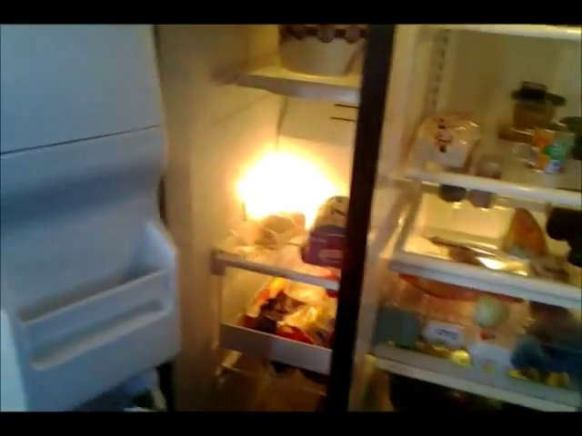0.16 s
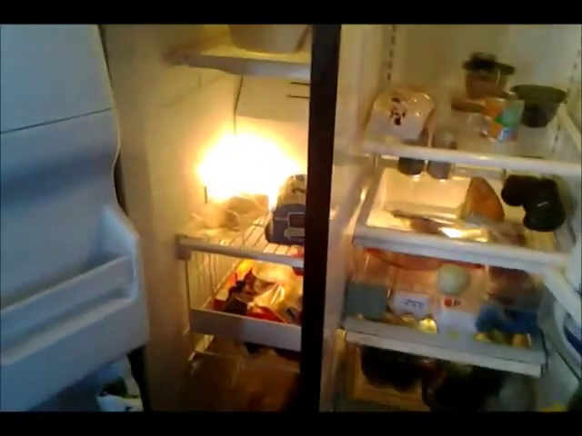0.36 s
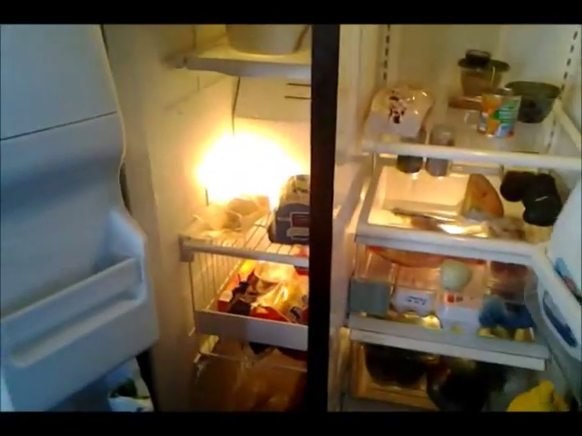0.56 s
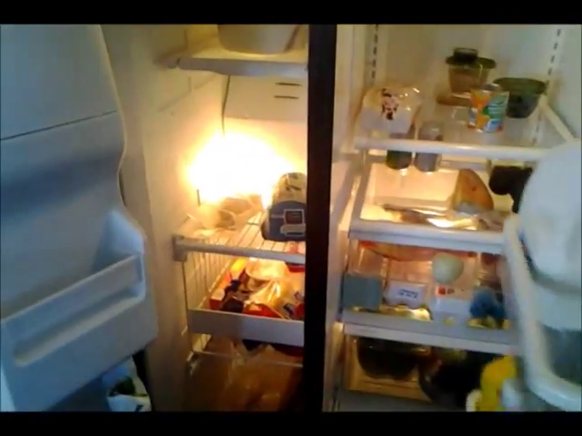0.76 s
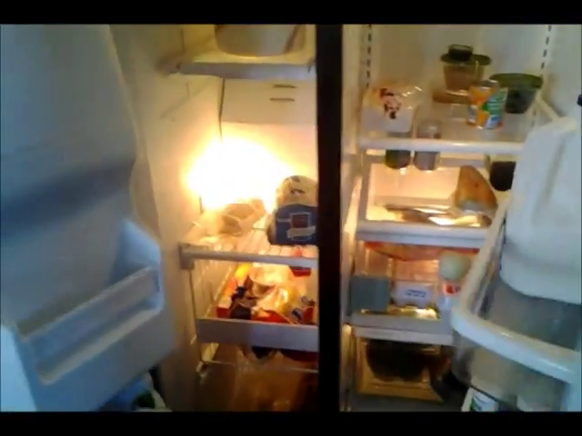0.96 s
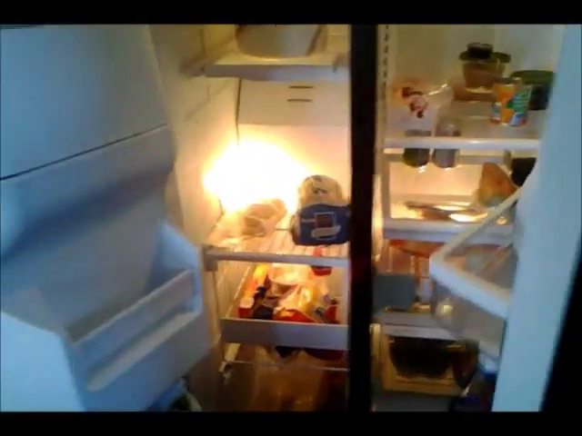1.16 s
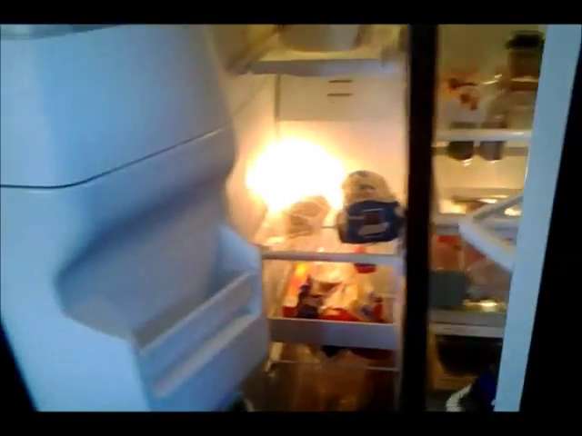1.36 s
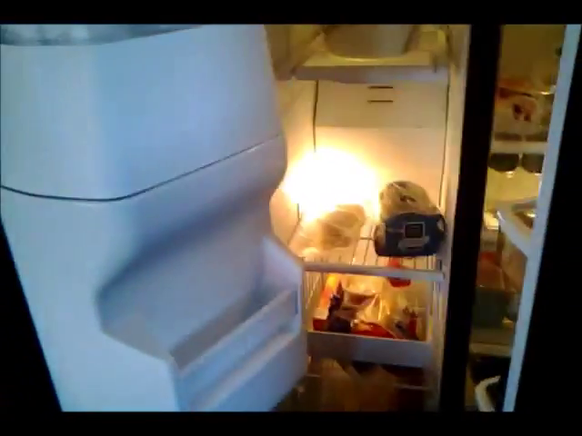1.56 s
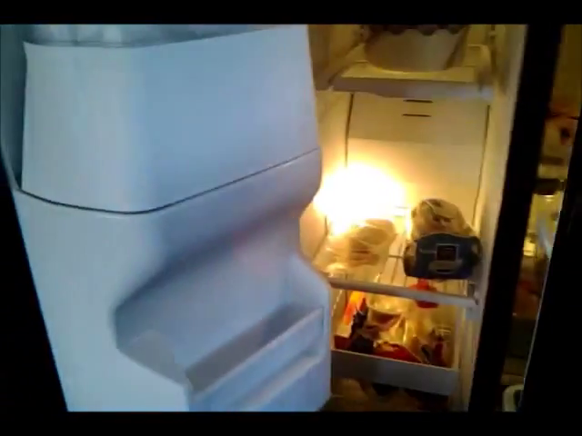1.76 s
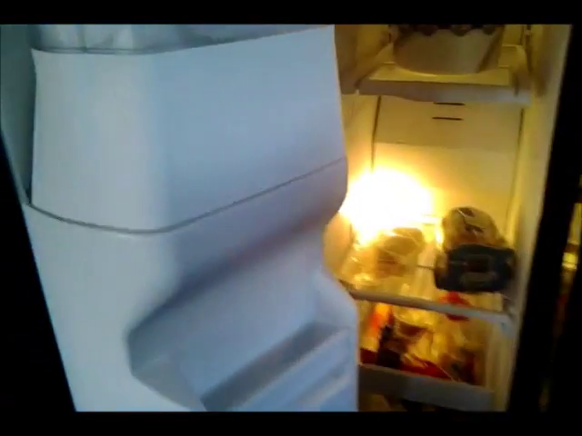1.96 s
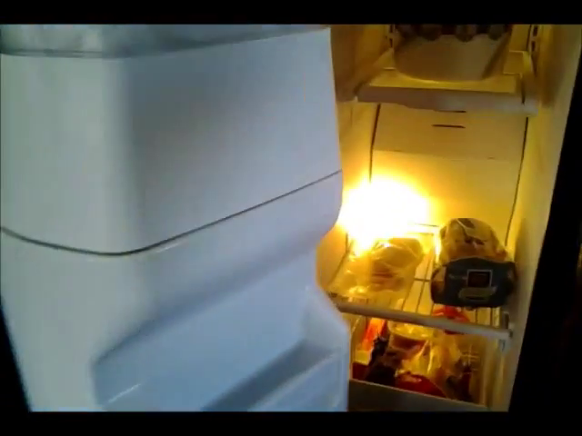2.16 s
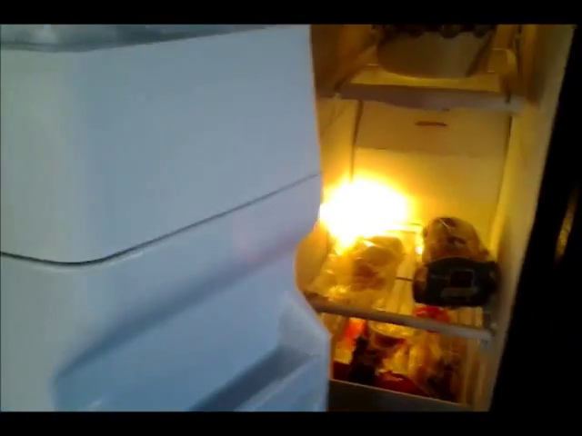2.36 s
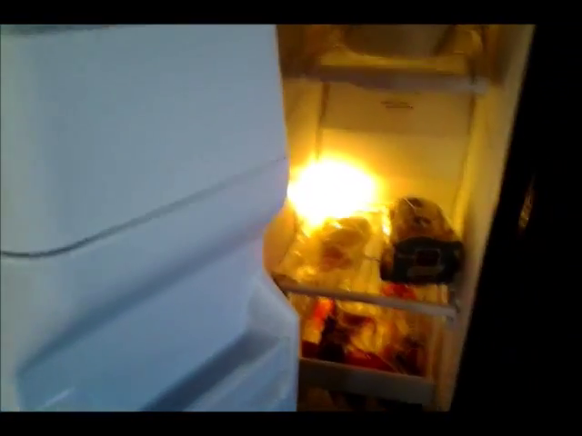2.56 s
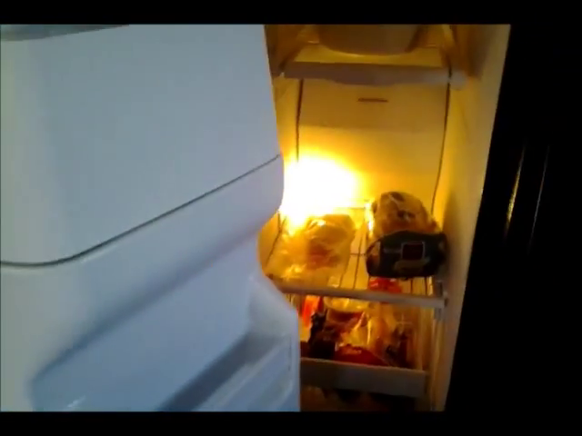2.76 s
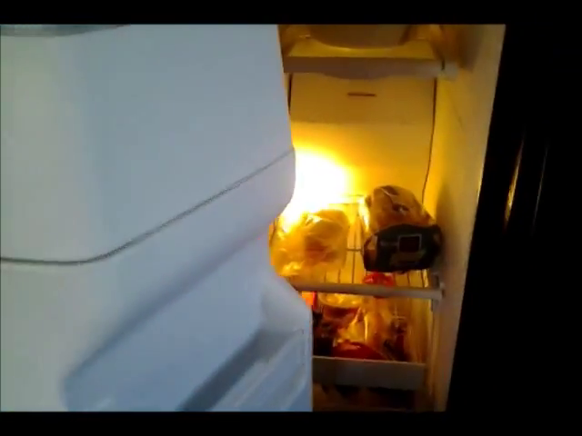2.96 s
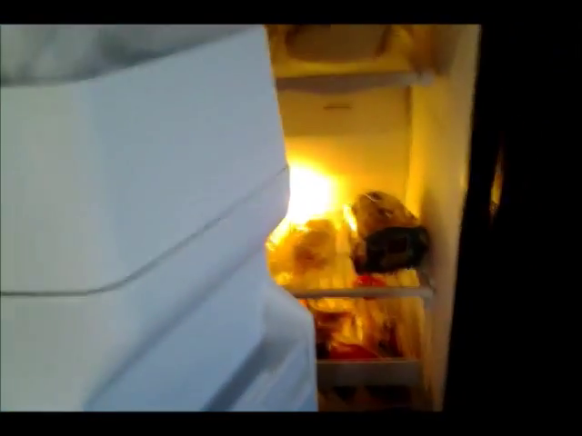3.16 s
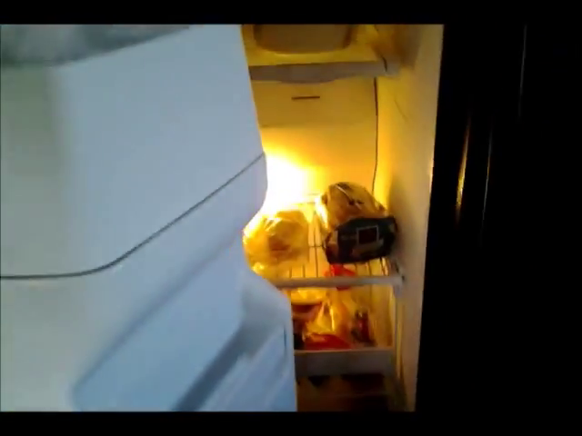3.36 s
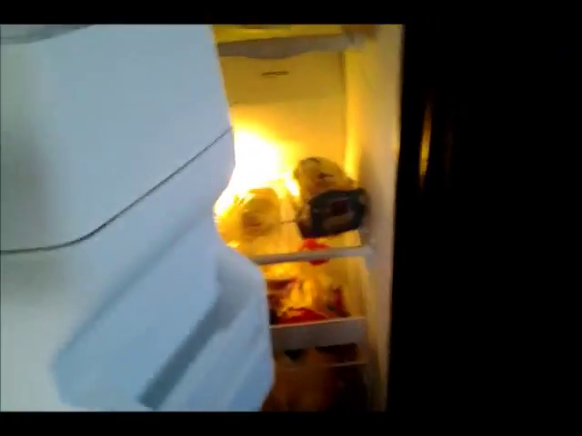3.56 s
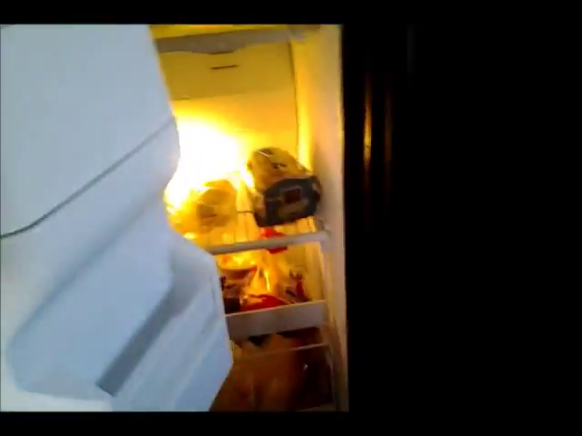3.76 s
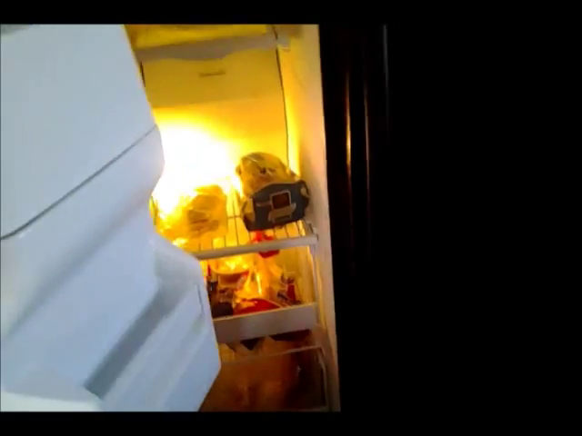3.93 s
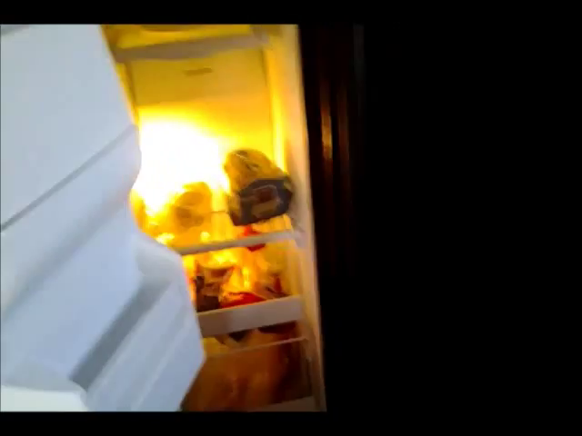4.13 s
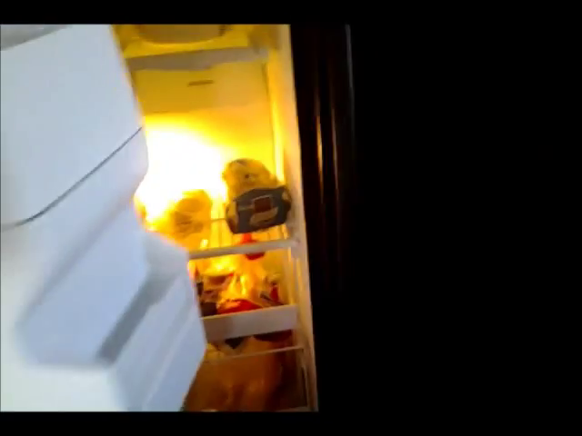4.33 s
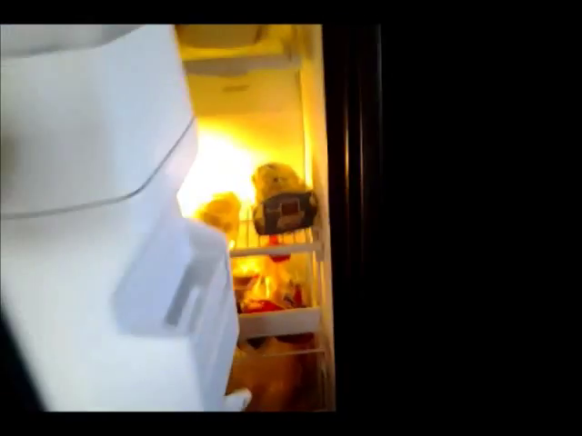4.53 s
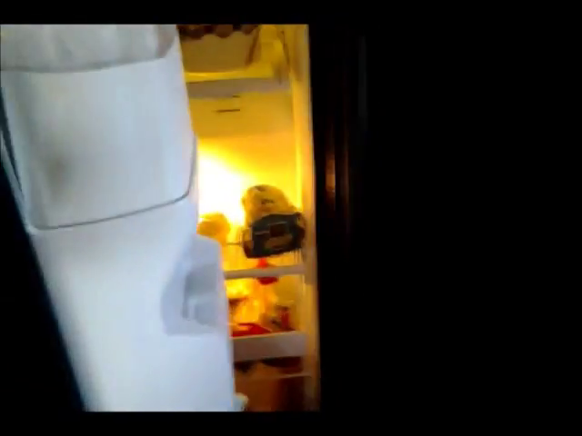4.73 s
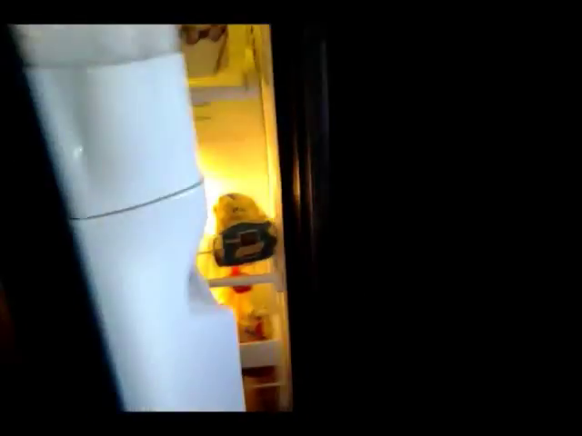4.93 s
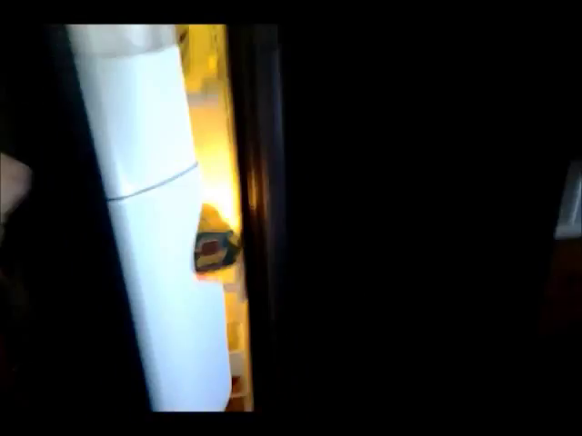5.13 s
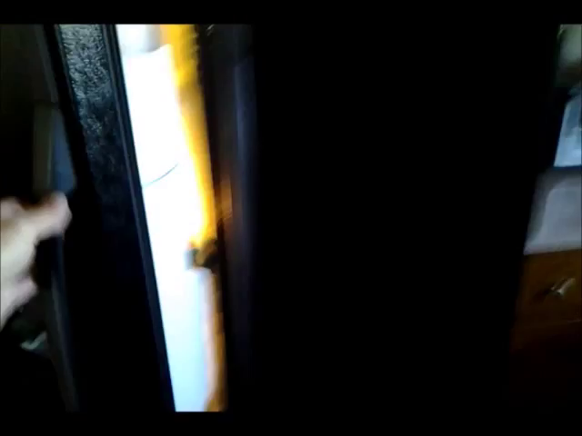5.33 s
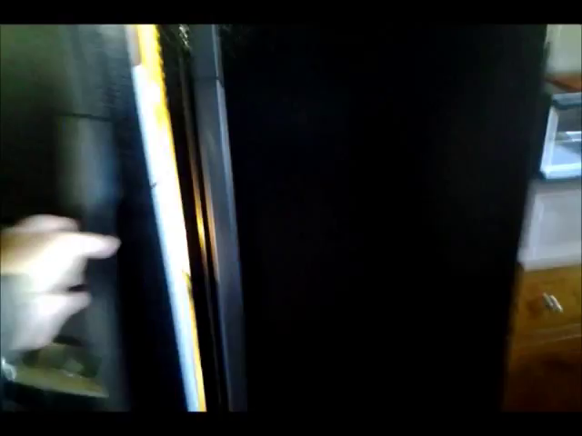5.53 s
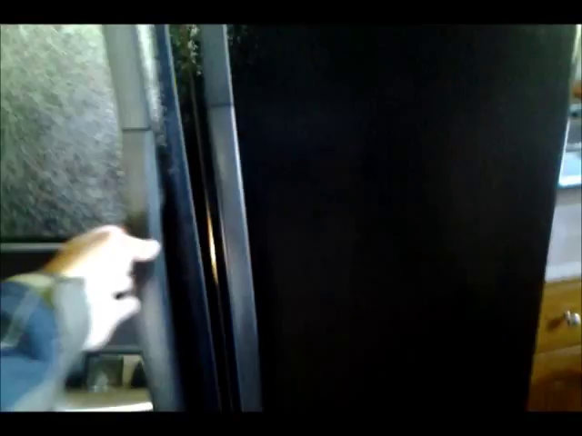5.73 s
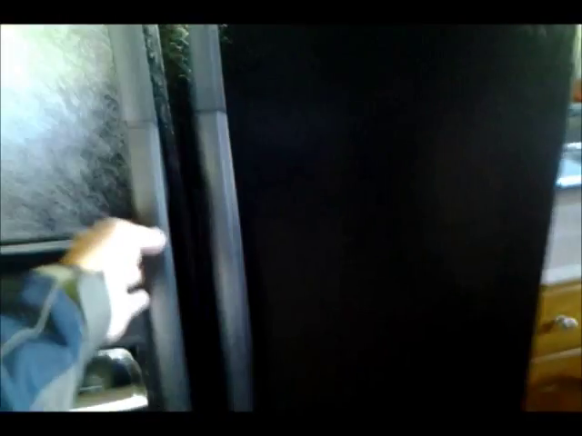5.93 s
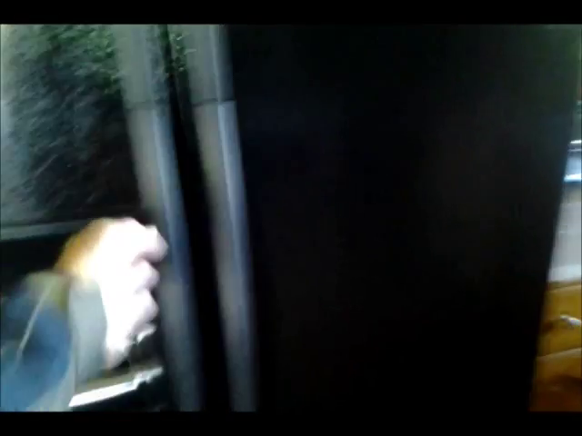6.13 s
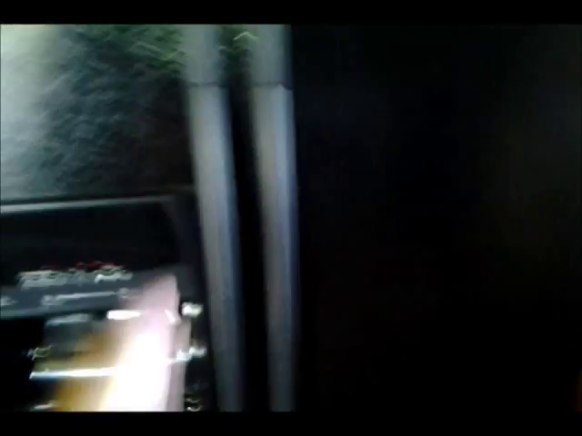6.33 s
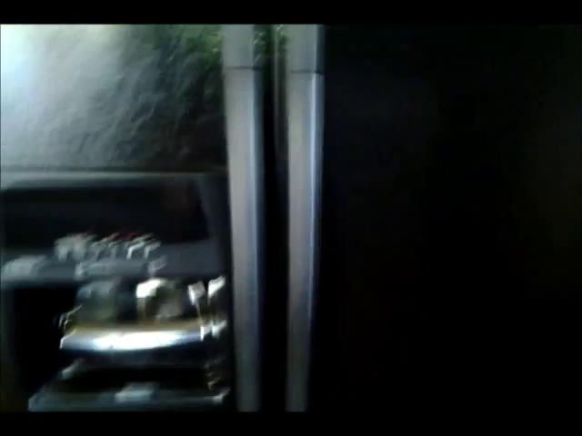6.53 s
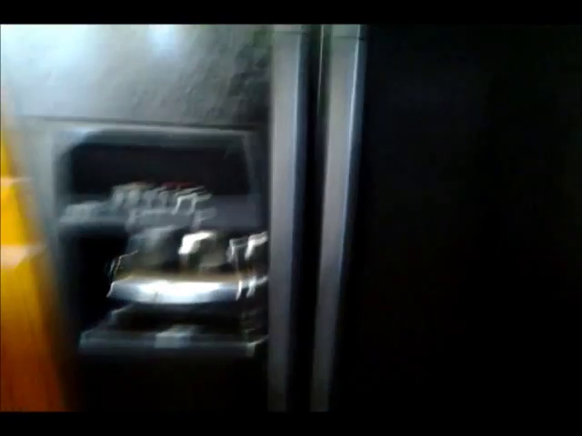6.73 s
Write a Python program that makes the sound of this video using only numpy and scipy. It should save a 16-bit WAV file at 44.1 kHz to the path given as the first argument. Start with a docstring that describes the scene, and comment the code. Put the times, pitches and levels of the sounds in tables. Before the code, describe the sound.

In a humming kitchen, a fridge door thumps closed with a plastic clatter, close ticks follow, then the second door slams and jars clink before it.

```python
"""A low compressor hum and soft rustling run throughout; close ticks and small bumps come before and between
the slams of two doors of a side-by-side refrigerator in a kitchen, pushed shut one after the other.
Slams and knocks are shaped noise and damped modes struck at once, with low swings for the moving mass.
Plastic bins clatter, loads in the door racks knock, rattle and clink, and decaying noise gives the room.
The hum is a sum of wavering tones; the microphone overloads on the slams and its treble is cut off."""
import sys
import numpy as np
from scipy import signal
from scipy.fft import rfft, irfft, next_fast_len
from scipy.io import wavfile
from scipy.ndimage import map_coordinates

SR = 44100
rng = np.random.default_rng(int(sys.argv[2]) if len(sys.argv) > 2 else 0)


def int16_out(signal):
    """Quantize to a 16-bit WAV file."""
    q = np.round(np.clip(np.atleast_2d(signal).T, -1, 1) * 32767)
    wavfile.write(sys.argv[1], SR, q.astype(np.int16))


N = 299478
TOP_HZ = 7500  # upper edge of the microphone's band

# Doors landing. Each row: time in seconds, levels in dB of crack, clatter, liner, cabinet and hollow body,
# hollow body in Hz, crack and clatter tilt in dB per octave, squeezed air in dB, push in dB, push in Hz,
# push swell in seconds, jolted loads in dB, their flight in seconds.
DOOR_LANDINGS = [(2.6122, -6.5, -15.5, -21, -18, -7.5, 194, -0.5, -25, -1, 93.8, 0.013, -16, .055),
                 (6.3235, -7.5, -11, -13, -20, -10.5, 291, 0.2, -14, -5.5, 75, 0.0024, -14, .019)]
# Noise of a contact with a plastic rack. Each row: frequency in Hz, spectral level in dB.
RACK_SPECTRUM = [(60, -28.5), (170, -4.5), (320, -0.5), (550, -4.5), (900, -8), (1500, -7), (2500, -13),
                 (4000, -24.5), (6000, -26), (7800, -57)]


def slams():
    """Impact excitation: a door cracks on its frame; bins, hollow door, liner, cabinet and loads answer."""
    # Sharp contact, then plastic bins. Each row: frequency in Hz, spectral level in dB.
    crack_spectrum = [(100, -11), (300, 7.5), (700, 2.5), (1500, 4), (2400, -11), (3400, -1.5),
                      (6000, -5.5), (7800, -26)]
    clatter_spectrum = [(60, -26), (150, -2.5), (300, 2), (480, -2.5), (650, -6.5), (1200, 0), (1850, -5.5),
                        (2400, -15), (3300, -12), (4300, -17.5), (6000, -18.5), (7800, -47)]
    # Plastic door liner. Each row: mode in Hz, width in Hz, relative level in dB.
    liner_modes = [(524, 38, -10), (732, 24, -3.5), (974, 75, -6), (1212, 33, 5), (1450, 70, -7.5),
                   (1613, 54, 0), (1868, 45, -0.5), (2236, 36, -4.5), (2470, 160, -8)]
    # Steel cabinet. Each row: mode in Hz, mean level in dB, t60 in seconds.
    cabinet_modes = [(64.7, -10, .4), (104.5, -5.5, 0.98), (133, -8, .35), (196.1, 1, 0.38),
                     (238.7, -6.5, 0.34), (292.2, -0.5, 0.31), (334, -10, 0.38), (363.6, -6.5, 0.5),
                     (477, -5, 0.34), (520.5, -10, 0.36)]
    out = np.zeros(N)
    for (s, crack_db, clatter_db, liner_db, cabinet_db, body_db, body_hz, tilt_db,
         *_, loads_db, flight) in DOOR_LANDINGS:
        chatter = amp(1.6 * wobble(169, size=SR))
        add(out, s, amp(crack_db) * burst(crack_spectrum, tilt_db, t60=0.046))
        add(out, s, amp(clatter_db) * chatter * burst(clatter_spectrum, tilt_db, t60=0.26))
        add(out, s, amp(body_db) * struck([(body_hz, body_hz * 0.37, 0)], t60=0.2))
        add(out, s, amp(liner_db) * struck(liner_modes, t60=0.15))
        add(out, s, amp(cabinet_db) * ring(cabinet_modes, rough=0.37, attack=0.0049))
        add(out, s + flight, amp(loads_db) * bouncing(body_hz=270, tilt_db=-4))
    return out


def thuds():
    """Momentum transfer: each slam squeezes air, pushes the frame and rocks the cabinet; doors also bump softly."""
    # Soft bumps of the swinging doors; the second row is the higher part of the first bump.
    # Each row: time in seconds, peak level in dB, frequency in Hz.
    soft_bumps = [(.433, -24, 42.7), (.455, -29.5, 148), (1.06, -34, 97), (2.39, -33, 110),
                  (3.859, -34, 84), (4.03, -35, 82), (5.483, -33, 75.4)]
    # the gasket meets the frame just before the shell, squeezing out air
    gasket_lead_s, squeeze_s = 0.0023, 0.0067
    # then the whole cabinet rocks, at a level relative to the push
    rock_delay_s, rock_db, rock_hz, rock_swell_s = 0.01, -7, 53, 0.019
    bump_swell_cycles = 1.1

    out, lead = np.zeros(N), seconds(SR // 10)
    # pressure grows exponentially until the door lands
    squeeze = np.exp((lead - lead[-1]) / squeeze_s) * signal.windows.tukey(len(lead), .02)
    for s, *_, air_db, push_db, push_hz, swell, _, _ in DOOR_LANDINGS:
        add(out, s - lead[-1], amp(air_db) * squeeze)
        add(out, s - gasket_lead_s, amp(push_db) * swing(push_hz, swell))
        add(out, s + rock_delay_s, amp(push_db + rock_db) * swing(rock_hz, rock_swell_s))
    for s, db, hz in soft_bumps:
        add(out, s, amp(db) * swing(hz, bump_swell_cycles / hz))
    return out


def racks():
    """Repeated impacts: loads knock and rebound on plastic racks, rattle unevenly and clink together."""
    # Knocking loads. Each row: time in seconds, level in dB, body in Hz, tilt in dB per octave.
    load_knocks = [(.504, -38.5, 330, 1), (.55, -33.5, 397, 1), (.564, -32, 385, 0.5), (.601, -33, 363, 6),
                   (1.1193, -21.5, 377, 0.65), (1.849, -38.5, 590, -7.5), (2.396, -30.5, 675, -1),
                   (2.5091, -31, 324, 1), (2.985, -36.5, 796, 1.5), (4.0209, -31, 480, -2.5),
                   (5.527, -34, 500, -2.5), (5.994, -17, 570, -2)]
    # Hard containers touching. Each row: time in seconds, ring level in dB, contact level in dB.
    container_clinks = [(5.997, -33.5, -35), (6.1097, -21, -25)]
    # Clinking container. Each row: mode in Hz, width in Hz, relative level in dB.
    container_modes = [(753, 21, -2.5), (931, 66, -2.5), (1135, 61, -0.5), (1544, 66, -2), (1790, 65, 2.5),
                       (1927, 55, 0.5), (2130, 92, -5.5), (2530, 60, -6.5), (2716, 50, -7),
                       (5400, 160, -24.5)]
    # First and last contact as the first door gathers speed, small loads first, then heavy ones.
    # Each row: time in seconds, level in dB, body in Hz, tilt in dB per octave, before random scatter.
    rattle_ends = [(2.41, -38.5, 673, 0), (2.6, -34, 170, -1.5)]
    out = np.zeros(N)
    for s, db, body_hz, tilt_db in load_knocks:
        add(out, s, amp(db) * bouncing(body_hz, tilt_db))
    for s, ring_db, contact_db in container_clinks:
        add(out, s, amp(ring_db) * struck(container_modes, t60=0.21))
        add(out, s, amp(contact_db) * burst(RACK_SPECTRUM, tilt_db=-1.5, t60=0.069))
    for s, db, body_hz, tilt_db in np.linspace(*rattle_ends, 11):
        late, strength, pitch = rng.uniform(-1, 1, 3)
        contact = knock(body_hz * np.exp(.3 * pitch), tilt_db)
        add(out, s + .005 * late, amp(db + 2 * strength) * contact)
    return out


def handling():
    """Near-field sound: ticks and brushes so close to the microphone that no room is heard on them."""
    # Small dry ticks. Each row: time in seconds, level in dB, centre frequency in Hz.
    close_ticks = [(0.218, -35, 4000), (2.307, -18, 576), (3.1438, -22, 3300), (3.3544, -27, 2230),
                   (3.573, -32, 1100), (3.6184, -25, 1100), (3.776, -21.5, 1500), (3.8066, -20.5, 1360),
                   (3.8525, -23.5, 910), (4.4253, -32.5, 1200)]
    # Brief brushing. Each row: start and end in seconds, level halfway in dB, swell from start to end in dB,
    # tilt in dB per octave.
    close_brushes = [(1.736, 1.818, -53, -3, 3), (2.892, 3.004, -44.5, -1, 1),
                     (3.191, 3.248, -37, 14.5, .5), (4.024, 4.084, -50, 3, -5.5),
                     (5.481, 5.539, -51, -6, -1.5)]
    # Cloth friction. Each row: frequency in Hz, spectral level in dB.
    cloth_spectrum = [(100, -14), (450, -10), (750, 5), (1500, -0.5), (2400, 0), (2900, 1.5), (3500, -1),
                      (5200, -5), (6400, -4.5), (7800, -29)]
    out, t = np.zeros(N), seconds(SR)
    for s, db, hz in close_ticks:
        # a short snap with a click, followed by a faint buzz of the casing; higher snaps die sooner
        decay = fade(0.0052 * (1000 / hz) ** 0.62)
        snap = np.sin(2 * np.pi * hz * t) * decay * (1 - np.exp(-8 * hz * t))
        buzz = amp(-16.5) * struck([(hz, hz * 0.27, 0)], t60=0.018)
        click = amp(-20.5) * burst(cloth_spectrum, tilt_db=-2.5, t60=0.0035)
        add(out, s, amp(db) * (snap + click + buzz))
    for start, end, db, swell_db, tilt_db in close_brushes:
        size = max(round((end - start) * SR), 64)
        grip_db = swell_db * np.linspace(-.5, .5, size) + 1.5 * wobble(192, size=size)
        grip = signal.windows.tukey(size, .3) * amp(grip_db)
        add(out, start, amp(db) * grip * noise(cloth_spectrum, tilt_db, size=size))
    return out


def background():
    """Steady tones and broadband noise: an unsteady compressor hum over rumble, air and soft rustle."""
    # Compressor and fan tones. Each row: frequency in Hz, mean rms level in dB.
    machine_tones = [(26.9, -51.5), (59.2, -53.5), (118.4, -59), (145.3, -56.5), (263.8, -53), (296.1, -60),
                     (441.4, -69.5), (619.1, -68)]
    # Low rumble, then air and rustle. Each row: frequency in Hz, spectral level in dB.
    rumble_spectrum = [(12, -32), (20, 5.5), (47, -4), (97, -8), (137, -4.5), (208, -9.5), (242, -11),
                       (262, -13), (312, -5.5), (500, -15.5), (650, -45), (1100, -120)]
    air_spectrum = [(240, -26), (400, -5.5), (538, -7), (881, -7.5), (1100, -10), (1340, -8.5),
                    (1940, -11.5), (2170, -14), (4720, -20.5), (7630, -31.5), (9920, -66), (16800, -120)]
    # Sleeve and hand movement. Each row: time in seconds, rustle level in dB.
    movement = [(0, -52.5), (.6, -51.5), (2.2, -51.5), (2.45, -46.5), (3.2, -52), (3.8, -49), (4.6, -53.5),
                (5.3, -50.5), (5.95, -52.5), (6.79, -45.5)]
    t = seconds(N)
    hum = np.zeros(N)
    for hz, db in machine_tones:
        level = amp(db + 0.93 * wobble(3.5, size=N)) * np.sqrt(2)
        hum += level * np.sin(2 * np.pi * hz * t + .35 * wobble(5.2, size=N))
    rumble_level = amp(-47.0 + 1.3 * wobble(6.6, size=N))
    rumble = rumble_level * noise(rumble_spectrum, tilt_db=-0.5, size=N)
    s, rustle_db = np.transpose(movement)
    air_level = amp(np.interp(t, s, rustle_db) + 0.44 * wobble(12, size=N))
    air = air_level * noise(air_spectrum, tilt_db=0, size=N)
    return hum + rumble + air


def kitchen(x):
    """Reverberation: a tail builds within milliseconds and each frequency decays at its own rate."""
    # Room decay. Each row: frequency in Hz, t60 in seconds.
    room_decay = [(60, 0.52), (250, 0.59), (1000, 0.82), (2500, 0.71), (7000, 0.5)]
    hz, t, z = signal.stft(rng.standard_normal(SR), SR, nperseg=256)
    decay = np.exp(-np.log(1000) * t / along(room_decay, hz)[:, None])
    tail = signal.istft(z * decay, SR, nperseg=256)[1]
    tail = tail * (1 - np.exp(-seconds(len(tail)) / 0.005))
    return signal.fftconvolve(x, tail / np.linalg.norm(tail))[:N]


def bouncing(body_hz, tilt_db, count=3):
    """Inelastic rebound: a load knocks again after each short flight; rebounds are softer and duller."""
    rebound_s, loss_db, rebound_tilt_db = .026, 8, -4
    out = np.zeros(SR)
    for k in range(count):
        contact = knock(body_hz, tilt_db + min(k, 1) * rebound_tilt_db)
        add(out, k * rebound_s, amp(-k * loss_db) * contact)
    return out


def knock(body_hz, tilt_db):
    """Contact excitation: a load strikes its plastic rack and adds its own hollow resonance."""
    attack_s, rack_t60_s = 0.00061, 0.098
    body = amp(-4.5) * struck([(body_hz, body_hz * 0.18, 0)], rack_t60_s * 1.38)
    contact = burst(RACK_SPECTRUM, tilt_db, rack_t60_s)
    return (contact + body) * (1 - np.exp(-seconds(SR) / attack_s))


def swing(hz, swell):
    """Heavily damped oscillation: a low swing whose envelope peaks after swell seconds and soon dies."""
    t = seconds(SR)
    return -(t / swell * np.exp(1 - t / swell)) ** 2 * np.sin(2 * np.pi * hz * t)


def ring(modes, rough, attack):
    """Modal superposition: modes are pushed off together, their phase shaken by loose parts."""
    t = seconds(SR)
    total = np.zeros(SR)
    for hz, db, t60 in modes:
        phase = 2 * np.pi * hz * t + rough * wobble(57, size=SR)
        total += amp(db + rng.normal(0, 1)) * fade(t60) * -np.sin(phase)
    return total * (1 - np.exp(-t / attack))


def resonances(modes, hz):
    """Resonance curves: the gain of a body whose modes add in power."""
    power = 0
    for f, width, db in modes:
        detuning = (hz * hz - f * f) / (width * hz + 1e-9)
        power = power + amp(2 * db) / (1 + detuning ** 2)
    return np.sqrt(power)


def struck(modes, t60):
    """Dense modal response: clustered modes ring unevenly and decay together."""
    hz = np.fft.rfftfreq(SR, 1 / SR)
    phases = np.exp(2j * np.pi * rng.random(len(hz)))
    return unit(irfft(resonances(modes, hz) * phases, SR)) * fade(t60)


def burst(spectrum, tilt_db, t60):
    """High modal density: many crowded modes are struck at once and decay together as noise."""
    return noise(spectrum, tilt_db, size=SR) * fade(t60)


def noise(spectrum, tilt_db, size):
    """Random-phase synthesis: noise of rms 1 whose spectrum leans by tilt_db per octave."""
    hz = np.fft.rfftfreq(size, 1 / SR)
    heard = (hz > 0) & (hz < TOP_HZ + 400)
    gain = amp(along(spectrum, hz) + tilt_db * np.log2(hz + 20)) * heard
    return unit(irfft(gain * np.exp(2j * np.pi * rng.random(len(hz))), size))


def fade(t60):
    """Exponential decay: one second of an envelope that falls 60 dB in t60 seconds."""
    return np.exp(-np.log(1000) * seconds(SR) / max(t60, 1e-3))


def wobble(rate, size):
    """Random modulation: a smooth random curve with rate knots a second."""
    knots = rng.standard_normal(int(size * rate / SR) + 4)
    return map_coordinates(knots, [seconds(size) * rate])


def amp(db):
    """Level to amplitude: decibels become a gain."""
    return 10 ** (np.asarray(db) / 20)


def unit(x):
    """Power normalisation: scale to rms 1."""
    return x / np.sqrt(np.mean(x ** 2) + 1e-20)


def along(points, hz):
    """Logarithmic frequency scale: read a (Hz, value) curve by interpolation."""
    f, v = np.transpose(points)
    return np.interp(np.log(hz + 1), np.log(f), v)


def seconds(size):
    """Sampled time: an axis in seconds."""
    return np.arange(size) / SR


def add(track, s, sound):
    """Superposition: mix a sound into the track from s seconds on."""
    part = track[round(s * SR):][:len(sound)]
    part += sound[:len(part)]


def scene():
    """Direct and reverberant sound: doors and loads in the room, with dry handling and background."""
    doors, loads, low = slams(), racks(), thuds()
    room = kitchen(amp(-9.5) * doors) + kitchen(amp(-8.5) * loads) + kitchen(amp(-16) * low)
    return (doors + loads + low + room + handling() + background())[None]


def record(dry):
    """Overload and band limiting: the microphone clips loud peaks, then a steep low-pass cuts the treble."""
    clipped = np.clip(dry, -.95, .95)
    size = next_fast_len(N + SR // 2)
    hz = np.fft.rfftfreq(size, 1 / SR)
    low_pass = 1 / np.sqrt(1 + (hz / TOP_HZ) ** 64)
    return irfft(rfft(clipped, size) * low_pass, size)[:, :N]


dry = scene()
out = record(dry)
int16_out(out)
```